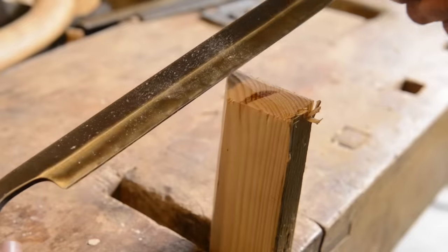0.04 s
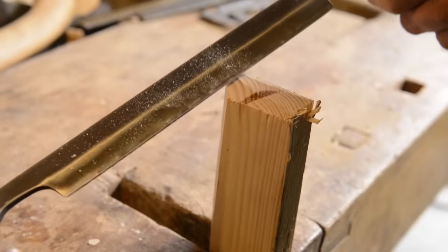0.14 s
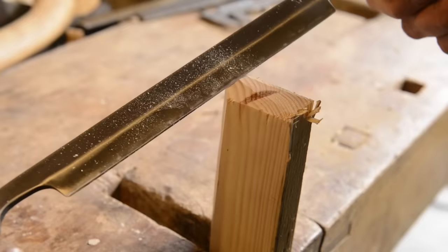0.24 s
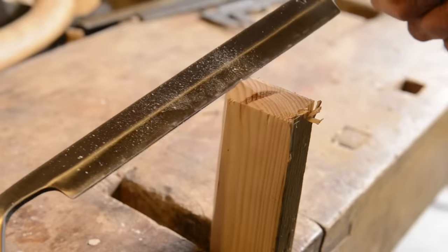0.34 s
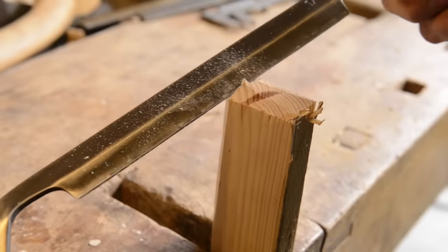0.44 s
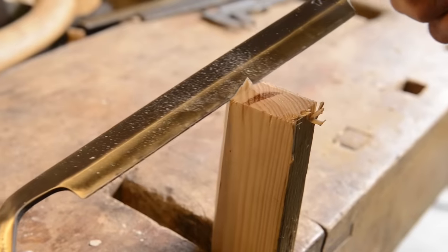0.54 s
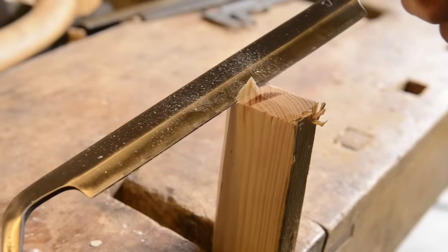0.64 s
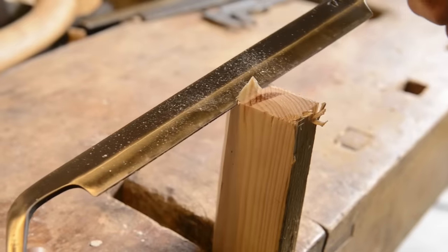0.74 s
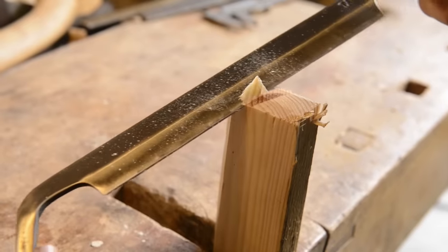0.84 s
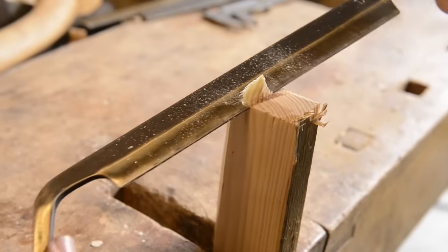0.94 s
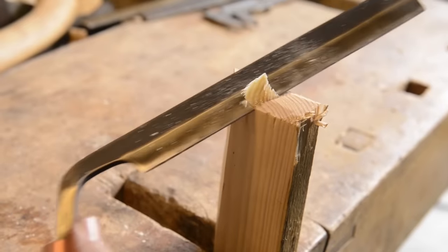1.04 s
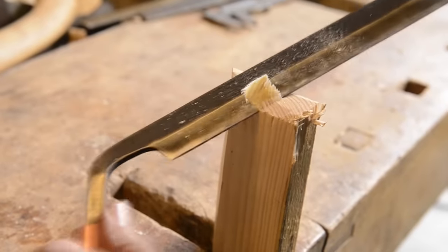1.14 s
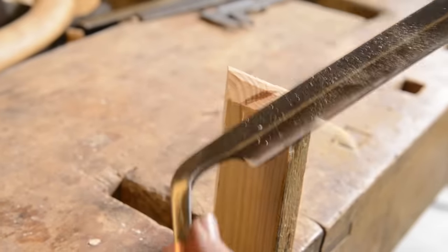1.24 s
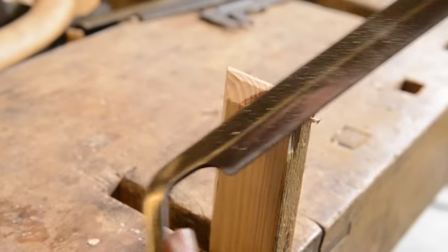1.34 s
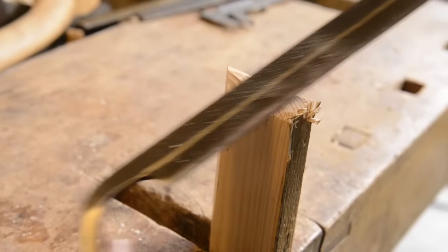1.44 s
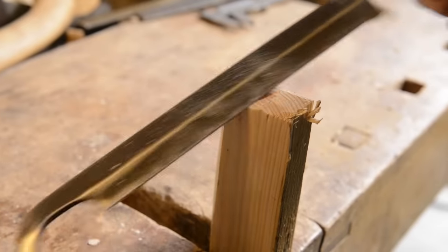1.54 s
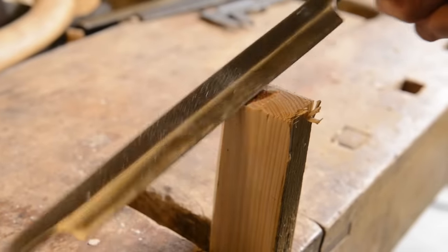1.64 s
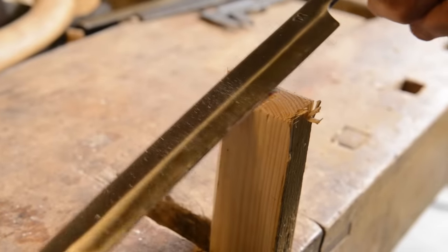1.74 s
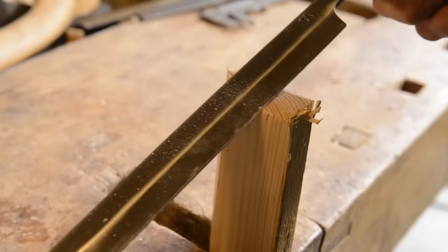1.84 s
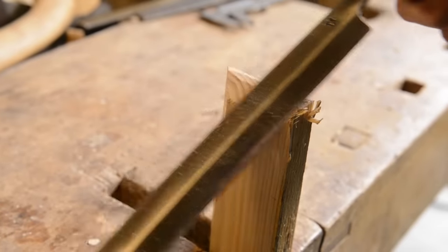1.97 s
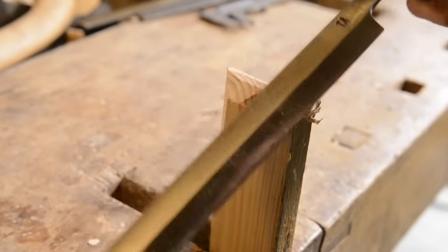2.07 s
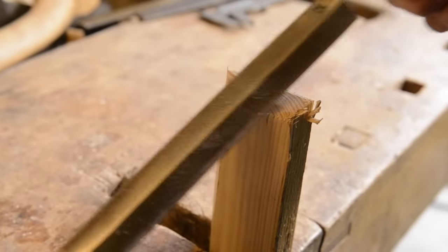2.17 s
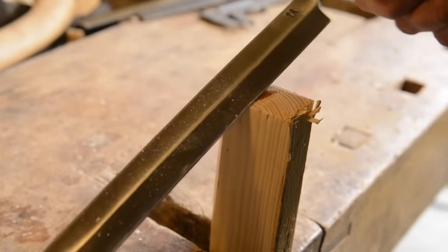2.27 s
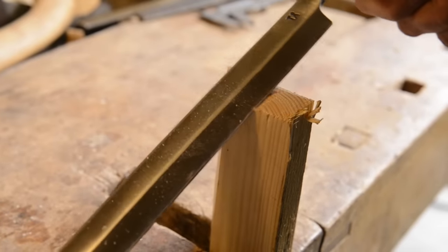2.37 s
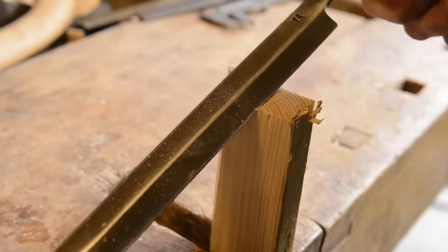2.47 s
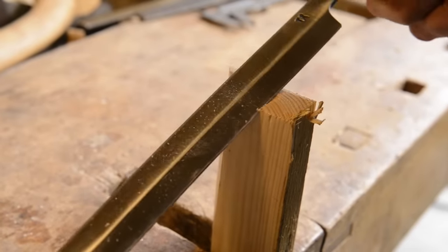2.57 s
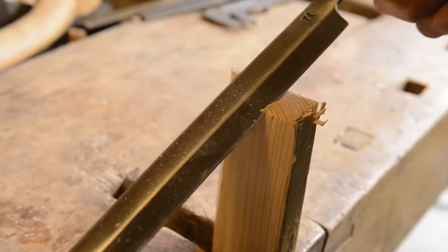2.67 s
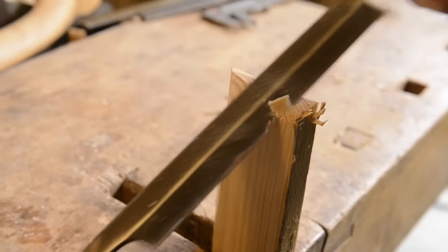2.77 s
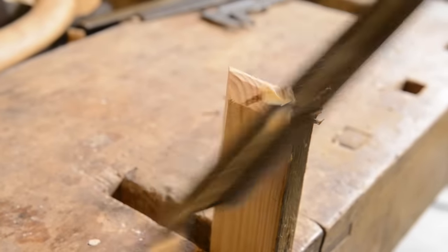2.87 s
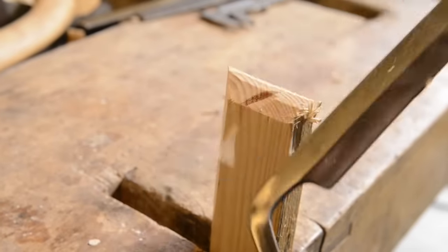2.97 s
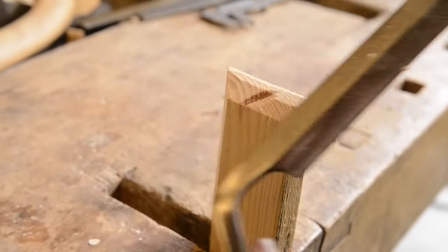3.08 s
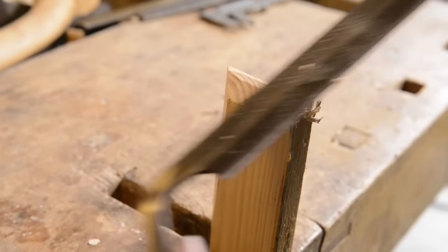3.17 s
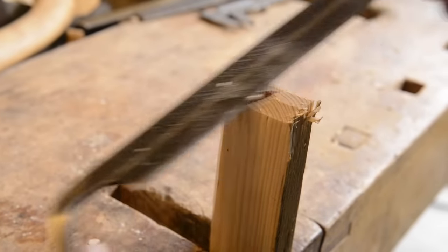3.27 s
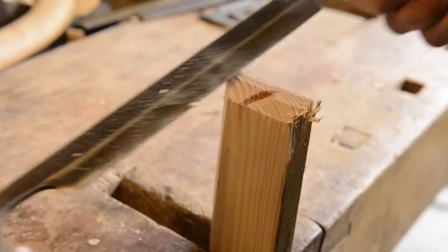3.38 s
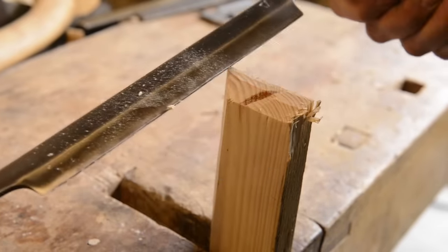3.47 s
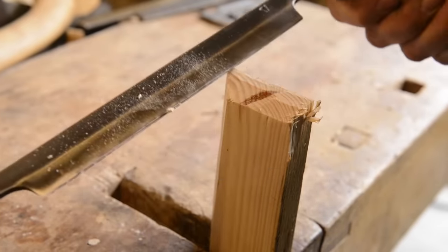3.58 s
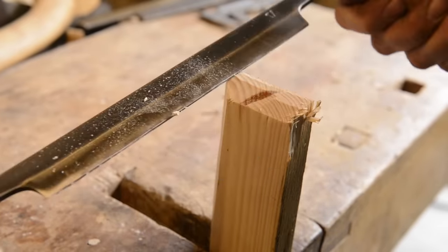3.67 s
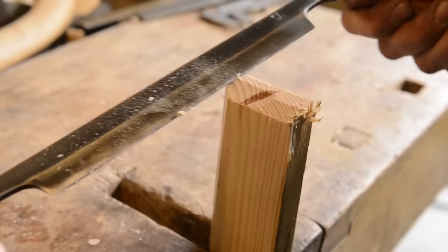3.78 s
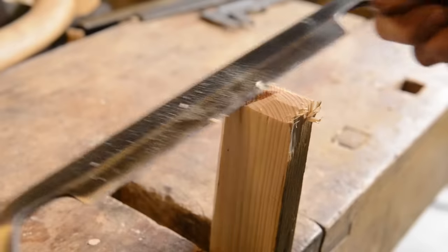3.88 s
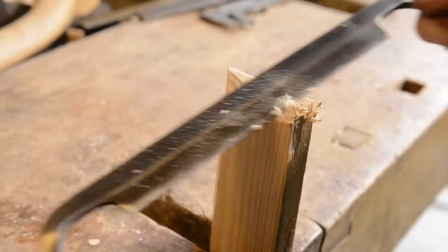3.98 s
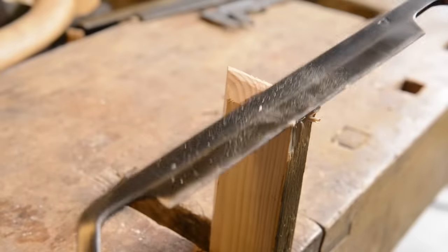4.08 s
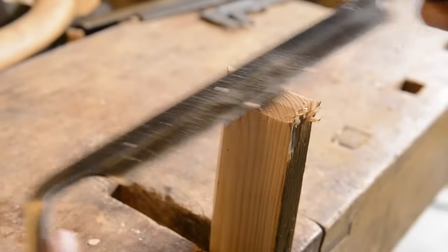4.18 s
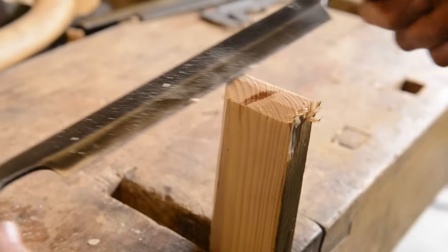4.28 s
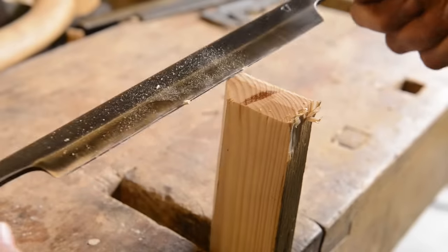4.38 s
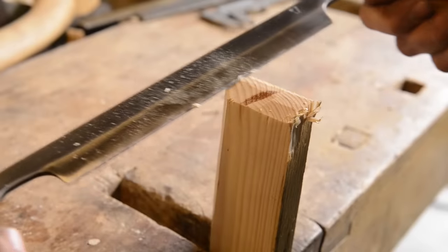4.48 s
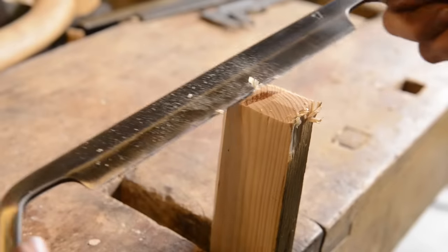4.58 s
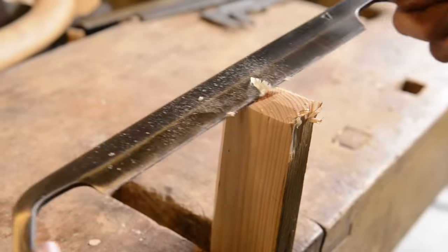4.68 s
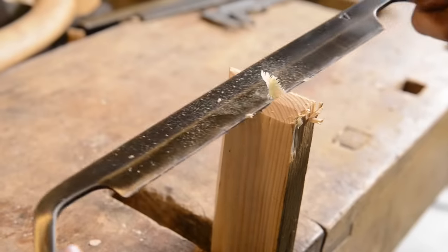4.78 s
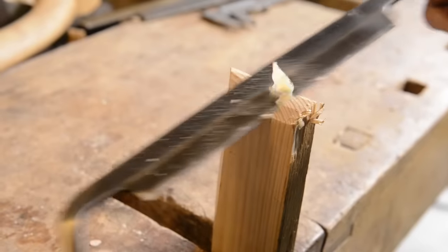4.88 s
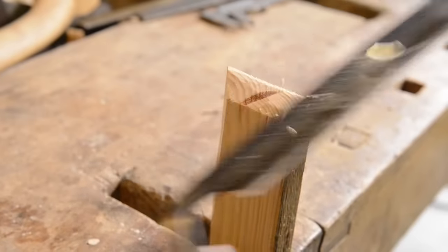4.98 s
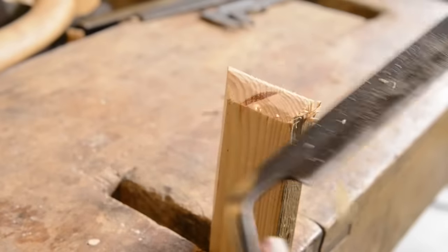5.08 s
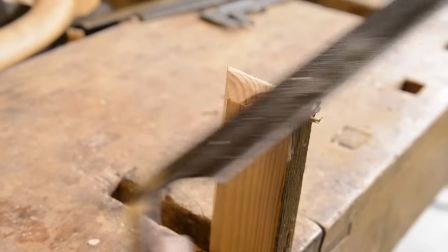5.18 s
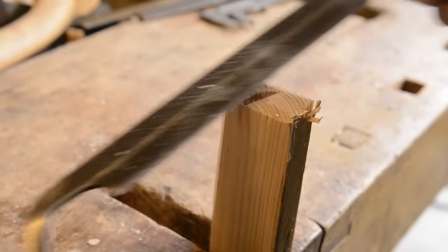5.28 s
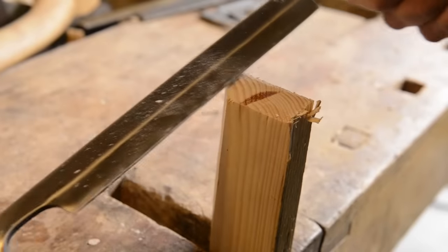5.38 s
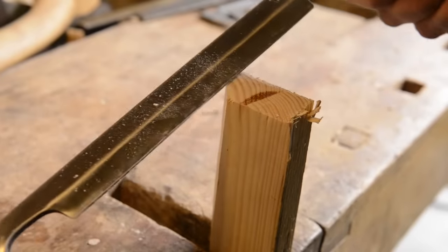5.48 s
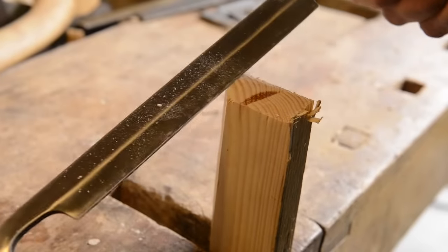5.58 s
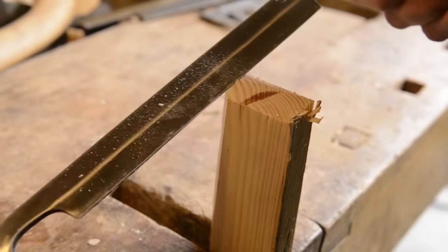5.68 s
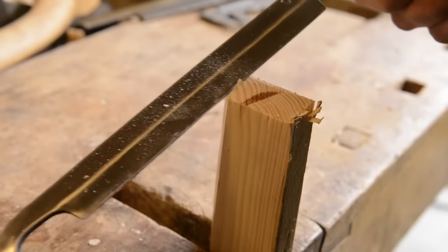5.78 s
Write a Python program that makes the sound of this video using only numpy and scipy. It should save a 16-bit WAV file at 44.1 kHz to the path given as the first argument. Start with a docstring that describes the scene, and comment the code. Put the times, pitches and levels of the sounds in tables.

```python
"""A steady outdoor hiss over a low rumble and a lone snap come first; then a drawknife pares softwood.
Each stroke on the clamped stick advances in bites: one force of breaking fibres and friction noise is
coloured by the wood, then split into bench boom, stick rasp, fibre tearing and edge hiss.
Shavings snap as shaped noise bursts, the blade knocks as noise plus ringing modes, soft bumps and brushing
mark its way back, and faint gliding whistles and short reflections surround the work."""
import sys
import numpy as np
from scipy import signal
from scipy.fft import rfft, irfft
from scipy.io import wavfile
from scipy.ndimage import uniform_filter1d, map_coordinates

SR = 44100
rng = np.random.default_rng(int(sys.argv[2]) if len(sys.argv) > 2 else 0)


def wav_record(signal):
    """Record a signal, one row per channel, as 16-bit PCM in the file named by sys.argv[1]."""
    frames = np.transpose(np.atleast_2d(signal))
    bounded = np.clip(frames, -1, 1)
    # unit amplitude maps onto the largest positive 16-bit level
    quanta = np.round(bounded * 32767).astype(np.int16)
    wavfile.write(sys.argv[1], SR, quanta)


N = 256662
TIME = np.arange(N) / SR
BURST_TIME = TIME[:SR // 2]   # half a second, the room for any short sound

# outdoor background colour: (frequency [Hz], relative density [dB per Hz])
AIR_COLOUR = [(13, -26), (22, -15), (49, -4), (76, -4.5), (112, -2), (199, -7), (241, -6.5), (651, -10.5),
              (707, -9.5), (857, -10.5), (931, -10), (1960, -17), (3690, -25.5), (6950, -26.5),
              (15900, -37.5)]
# thin, faint gliding tones:
# (time [s], length [s], start pitch [Hz], middle pitch [Hz], end pitch [Hz], peak level [dB])
WHISTLE_GLIDES = [(3.298, 0.095, 8700, 8300, 9100, -54), (4.16, 0.27, 10000, 10950, 10850, -65),
                  (4.382, 0.032, 8650, 8400, 7950, -58)]
# dying time of the reflections round the bench: (frequency [Hz], t60 [s])
REFLECTION_DECAY = [(150, 0.51), (500, 0.3), (2000, 0.3), (6000, 0.18), (14000, 0.26)]
# the flat of the blade brushes back over the wood: (time [s], length [s], landing level before the mix [dB])
RETURN_STROKES = [(1.274, 0.49, -29), (1.686, 0.074, -30.5), (2.993, 0.47, -37.5), (5.05, 0.4, -36)]
# soft bumps while the knife is carried back: (time [s], relative level [dB])
CARRY_BUMPS = [(0.01, -33.5), (1.366, -31), (1.466, -27), (1.491, -28.5), (3.061, -26.5), (3.18, -26.5),
               (3.3, -32.5), (5.145, -44), (5.256, -33), (5.312, -34), (5.377, -34)]
# shavings split and chips fly: (time [s], relative level [dB], centre [Hz], width [octaves], t60 [s])
SHAVING_SNAPS = [ (0.0345, -13.5, 8950, 0.35, 0.0085), (0.927, -12, 4500, 6.7, 0.015),
                 (1.029, -18.5, 3320, 3.4, 0.06), (1.0524, -9, 2880, 1.6, 0.011),
                 (1.21, -9, 3130, 3.8, 0.052), (1.2516, 12, 2076, 0.18, 0.0012),
                 (1.511, -29.5, 3530, 1.6, 0.024), (1.816, -27, 3950, 5.7, 0.069),
                 (2.678, -11, 2650, 1.1, 0.013), (2.794, -3.5, 3480, 5.8, 0.057),
                 (2.812, 2, 3180, 0.092, 0.013), (2.837, 0.5, 2470, 0.6, 0.012),
                 (2.852, 4.5, 2740, 0.48, 0.004), (2.903, -1, 2070, 0.59, 0.023),
                 (2.911, -2, 6700, 1.3, 0.039), (2.986, -8.5, 3260, 2.4, 0.036),
                 (3.128, -27, 10100, 2, 0.023), (4.732, -15.5, 3560, 8.2, 0.051),
                 (4.945, -6, 2530, 0.22, 0.052), (4.991, -4, 4000, 11, 0.029),
                 (5.037, -23, 3500, 1.4, 0.016), (5.074, -23.5, 5000, 1.6, 0.014),
                 (5.187, -38.5, 7200, 1.5, 0.034), (5.598, -42, 7000, 2.3, 0.11)]
# blade and stick knock together, and once, near 1.67 s, the brushing blade squeaks into a ring: (time [s], ring
# level [dB], most excited pitch [Hz], spread [octaves], contact noise level [dB])
BLADE_KNOCKS = [ (0.237, -35, 410, 1, -46), (1.054, -15, 274, 1.14, -47), (1.218, -11.5, 397, 1.27, -28),
                (1.229, -10.5, 325, 0.38, -19.5), (1.243, -14.5, 770, 0.29, -32),
                (1.254, -14.5, 1810, 0.15, -15.5), (1.587, -19, 575, 0.27, -25.5),
                (1.629, -26, 520, 0.26, -38), (1.67, -24, 1024, 0.048, -34), (1.695, -25, 2100, 0.6, -16.5),
                (1.699, -5.5, 1007, 0.031, -30), (1.717, -24, 645, 0.3, -24.5), (2.35, -40, 740, 1.3, -29),
                (2.92, -9.5, 327, 0.5, -21), (3.673, -27.5, 1720, 0.13, -28.5),
                (3.682, -26, 560, 0.47, -52), (4.415, -32, 573, 0.62, -36.5), (5.581, -36, 485, 0.63, -49)]
# modes of blade, stick and bench: (pitch [Hz], level relative to the knock's ring [dB], t60 [s])
WORK_MODES = [ (172, -4.5, 0.2), (235, 4, 0.065), (320, -7.5, 0.22), (348.2, -3.5, 0.19), (452, -2, 0.11),
              (550, 3, 0.03), (617, -12, 0.16), (759, -3.5, 0.24), (950, 4, 0.099), (1007, -8, .23),
              (1140, -6.5, 0.063), (1194, 4, 0.21), (1720, 5.5, 0.039), (2040, 7, 0.098), (2340, 3, 0.037),
              (2890, -41, .09), (3280, 12, 0.025)]
# colour of the contact noise: (frequency [Hz], relative density [dB per Hz])
CONTACT_COLOUR = [(50, -4), (120, 11.5), (260, 9), (600, 12.5), (1300, 6.5), (2200, -10), (3600, -27),
                  (5000, -16), (9000, -25), (16000, -27)]
# broad colour of the cut: (frequency [Hz], relative density [dB per Hz])
CUT_COLOUR = [(53, -74.5), (90, -51), (136, -9.5), (180, -8.5), (296, 2), (352, -1.5), (519, -7),
              (873, 0.5), (994, -8.5), (1440, -10.5), (2930, -18.5), (4330, -20.5), (6120, -15.5),
              (9440, -17.5), (15900, -33)]
# resonances and hollows of the rubbed blade and stick: (centre [Hz], width [Hz], lift [dB])
WOOD_FORMANTS = [(143.8, 34, 15), (228.7, 26.4, 13), (300, 41, 7), (407, 12.6, 6.5), (734, 11, 10),
                 (881.3, 19.5, 8), (1280, 130, -5), (1460, 69, -8), (1675, 18, 11.5), (2004, 51, 7),
                 (2236, 72, 7), (2503, 125, 7.5), (2737, 96, 6), (2917, 260, 9), (3292, 49, 7),
                 (3510, 350, 3.5), (3850, 39, 14.5), (4000, 430, -3), (4946, 71, 9.5), (5360, 55, 9),
                 (5720, 41, 12), (6130, 74, 6), (6650, 36, 11), (7105, 31, 14), (7600, 100, 8),
                 (7333, 49, -17), (8470, 21, 16.5), (9750, 53, 7.5), (10500, 50, -1)]
# each stroke meets blade and stick at another spot; the shaving pitch is that of mid-stroke:
# (time [s], bench boom over stick rasp [dB], stick pitch [Hz], lift [dB],
#  shaving pitch [Hz], lift [dB], edge pitch [Hz], lift [dB])
CUT_STROKES = [ (0.30, -1.5, 895, 3, 2950, 2.5, 7550, 2.5), (0.80, 7, 590, 2.5, 5270, -1, 8400, 4.5),
               (1.00, 6, 990, 3.5, 3560, 3, 9200, 3.5), (1.80, -2, 755, 6.5, 3260, 5.5, 5550, 3),
               (2.38, -9, 750, 4.5, 6700, -5, 8100, 4), (2.58, 0.5, 387, 1, 3150, 4.5, 10800, 3),
               (3.68, -7, 690, 6.5, 2670, 7.5, 5140, 1.5), (4.46, -3.5, 580, 7.5, 2830, 5.5, 5860, 2.5),
               (4.87, 0.5, 1184, 6, 2860, 11.5, 10800, 1.5), (5.701, 0.5, 870, 1.5, 3100, 0, 6070, 4.5)]
# the edge advances in bites, each a rise, a hold and a release; levels before the mix:
# (time [s], rise [s], hold [s], edge hiss [dB], stick rasp over hiss [dB], fibre tearing over hiss [dB])
CUT_BITES = [ (0.33, 0.041, 0.052, -31, 0.5, -2.5), (0.397, 0.047, 0.065, -31, -1.5, 0.5),
             (0.546, 0.056, 0.057, -27.5, -2.5, 1.5), (0.674, 0.029, 0.077, -35.5, -4.5, 4.5),
             (0.8, 0.049, 0.04, -27, -6.5, 3.5), (0.893, 0.043, 0.031, -24.5, -4.5, 4),
             (1.016, 0.036, 0.02, -24, 0, 4), (1.084, 0.055, 0.017, -20.5, -4, 4),
             (1.807, 0.025, 0.033, -37.5, 4.5, 7), (1.87, 0.091, 0.024, -35.5, 4, 5),
             (1.941, 0.057, 0.014, -29, 5, -4.5), (2.397, 0.029, 0.015, -41, 8, 5),
             (2.506, 0.023, 0.02, -46.5, 5, 12), (2.591, 0.039, 0.044, -38.5, -2, 10),
             (2.655, 0.024, 0.1, -32, -3, 8.5), (2.740, 0.054, 0.071, -14, -3.5, 2.5),
             (2.865, 0.033, 0.0028, -12, -1.5, -1.5), (3.693, 0.016, 0.043, -38.5, 0.5, -6),
             (3.781, 0.057, 0.015, -22, -4.5, -10.5), (3.835, 0.039, 0.051, -28.5, 7, -5),
             (3.87, 0.063, .04, -23.5, 6.5, 2), (3.941, 0.053, 0.075, -20, 3.5, -3),
             (4.48, 0.048, 0.095, -23, -5.5, -9), (4.542, 0.03, 0.083, -25.5, 5.5, 0),
             (4.666, 0.099, 0.04, -20.5, 6, 4), (4.802, 0.023, 0.047, -29.5, -5, 2.5),
             (4.884, 0.073, 0.027, -12, -2.5, 1.5), (4.997, 0.017, 0.023, -27.5, 5, -8),
             (5.715, 0.029, 0.044, -32, -2, -3.5)]
# how fast each part falls after a bite: bench, stick, fibres, edge [dB per s]
PART_RELEASES = [350, 316, 410, 430]

AIR_DB = -44.5
BUMP_HZ = 338
RISE_CURVE = 1.4   # the force builds as this power of time
BENCH_LAG_S = 0.0085   # the heavy bench answers late
DRAG_DB = -10.5   # between bites the edge stays in the wood and drags on, this far below them
SHAVING_FALL_OCTAVES = 0.16   # over a stroke the shaving grows longer and rings lower
WANDER, WANDER_RATE = .006, 4   # waver as the contact travels: share of pitch, times a second
CUTOFF_HZ = 15900


def from_db(db):
    """Decibels to gain."""
    return 10 ** (np.asarray(db) / 20)


def rms_one(x):
    """Scale to unit rms."""
    return x / np.sqrt(np.mean(x ** 2) + 1e-20)


def at_hz(points, hz):
    """Read the second column of a table on a log-frequency axis."""
    table = np.array(points)
    return np.interp(np.log(hz), np.log(table[:, 0]), table[:, 1])


def colour(x, db_at, size=8192):
    """Causal (minimum-phase) filter whose gain in dB is a function of Hz; white noise keeps its level."""
    hz = np.maximum(np.arange(size // 2 + 1) * SR / size, 1)
    gain = rms_one(from_db(db_at(hz)))
    cepstrum = irfft(np.log(gain + 1e-9))
    # folding the cepstrum onto positive time makes the filter minimum-phase
    cepstrum[1:size // 2] *= 2
    cepstrum[size // 2 + 1:] = 0
    response = irfft(np.exp(rfft(cepstrum)))
    return signal.fftconvolve(x, response)[:len(x)]


def band(x, low, high, order=4):
    """Butterworth band-pass."""
    edges = [low, min(high, .48 * SR)]
    return signal.sosfilt(signal.butter(order, edges, "band", fs=SR, output="sos"), x)


def drift(rate):
    """Smooth random curve of unit rms that changes about `rate` times a second."""
    hz = np.arange(N // 2 + 1) * SR / N
    spectrum = rfft(rng.standard_normal(N)) / (1 + (hz / rate) ** 2)
    return rms_one(irfft(spectrum, N))


def fade(t60):
    """Half a second of exponential decay, down 60 dB after t60 seconds."""
    return np.exp(-np.log(1000) * BURST_TIME / t60)


def burst(t60):
    """Noise that starts at once and dies away."""
    return rng.standard_normal(SR // 2) * fade(t60)


def add(out, s, sound):
    """Mix a sound in at a time in seconds."""
    start = max(round(s * SR), 0)
    out[start:start + len(sound)] += sound[:N - start]


def hump(hz, centre, width):
    """Resonance shape, 1 on top."""
    return 1 / (1 + (2 * (hz - centre) / width) ** 2)


def push(t, rise_s, hold_s, release_db_per_s):
    """Gain of one push, t seconds after it starts: it builds, holds and lets go."""
    built = np.clip(t / rise_s, 1e-6, 1) ** RISE_CURVE
    return built * from_db(-release_db_per_s * np.maximum(t - rise_s - hold_s, 0))


def wood_colour(hz):
    """Broad colour of the cut with its resonances and hollows, in dB."""
    return at_hz(CUT_COLOUR, hz) + sum(db * hump(hz, centre, width) for centre, width, db in WOOD_FORMANTS)


def air():
    """Steady outdoor hiss over a low rumble: coloured noise whose level wavers slightly."""
    waver_db = .35 * drift(2)
    hiss = colour(rng.standard_normal(N), lambda hz: at_hz(AIR_COLOUR, hz))
    return from_db(AIR_DB + waver_db) * hiss


def whistles():
    """Short, high sine tones that glide along a parabola through three pitches and swell and fade."""
    out = np.zeros(N)
    for s, length, start_hz, middle_hz, end_hz, db in WHISTLE_GLIDES:
        along = np.linspace(0, 1, int(length * SR))
        parabola = np.polyfit([0, .5, 1], [start_hz, middle_hz, end_hz], 2)
        phase = 2 * np.pi * np.cumsum(np.polyval(parabola, along)) / SR
        add(out, s, from_db(db) * np.sin(np.pi * along) * np.sin(phase))
    return out


def reflections(build_s=0.00043):
    """Diffuse response of the surroundings, unit energy: noise bands that each die at their own rate."""
    edges = np.geomspace(80, 20000, 9)
    tail = 0
    for low, high in zip(edges, edges[1:]):
        t60 = at_hz(REFLECTION_DECAY, np.sqrt(low * high))
        tail = tail + band(burst(t60), low, high, order=2)
    tail = tail * (1 - np.exp(-BURST_TIME / build_s))
    return tail / np.sqrt(np.sum(tail ** 2))


def brushing(catch_db=2.5, catch_rate=40, tilt_db=-0.5, landing_s=0.011, ease_db=9, ease_s=0.15,
             lift_db_per_s=170):
    """Light rubbing that catches here and there and eases after the blade lands; tilt in dB an octave."""
    rub = rng.standard_normal(N) * from_db(catch_db * drift(catch_rate))
    pressure = np.zeros(N)
    for s, length, db in RETURN_STROKES:
        eased = 1 - np.exp(-np.maximum(TIME - s - landing_s, 0) / ease_s)
        stroke = push(TIME - s, landing_s, length - landing_s, lift_db_per_s)
        pressure += from_db(db - ease_db * eased) * stroke
    return pressure * colour(rub, lambda hz: wood_colour(hz) + tilt_db * np.log2(hz))


def bumps(t60=0.045, width=1.57, swell_s=0.0096, level_db=4.0):
    """Dull, short thuds: low-pitched noise with a soft start and a quick decay."""
    out = np.zeros(N)
    swell = from_db(level_db) * 2 * (1 - np.exp(-BURST_TIME / swell_s))
    for s, db in CARRY_BUMPS:
        noise = rng.standard_normal(SR // 2)
        thud = rms_one(band(noise, BUMP_HZ / width, BUMP_HZ * width, order=3))
        add(out, s, from_db(db) * thud * fade(t60) * swell)
    return out


def snaps(skirt_db=-14.0, first_crack=1.84, brittle_s=0.04, swell_share=0.055, damping_hz=12000):
    """A brittle break is one sharp crack, a tough one swells and tears on; piece size sets the pitch."""
    out = np.zeros(N)
    for s, db, centre_hz, width, t60 in SHAVING_SNAPS:
        split = burst(t60) * (1 - np.exp(-BURST_TIME / (swell_share * t60)))
        split[0] = first_crack * np.exp(-t60 / brittle_s)   # the shorter the snap, the sharper its onset

        def snap_db(hz):
            """Peak at the piece's pitch, with the treble absorbed by the wood."""
            peak = skirt_db * np.log10(1 + (2 * np.log2(hz / centre_hz) / width) ** 2)
            size_loss = 10 * np.log10(1 + (hz / centre_hz / 2) ** 2)
            wood_loss = 10 * np.log10(1 + (hz / damping_hz) ** 4)
            return peak - size_loss - wood_loss

        add(out, s, from_db(db) * colour(split, snap_db))
    return out


def knocks(contact_t60=0.13, press_s=0.00029, scatter_db=0.1,
           tick_db=-2.0, tick_hz=2600, tick_octaves=0.94, tick_t60=0.029):
    """The steel lands with a tick; where and how hard it lands decides which modes ring most."""
    def tick_colour(hz):
        """Single broad peak of the tick, in dB."""
        return -20 * np.log10(1 + (np.log2(hz / tick_hz) / tick_octaves * 2) ** 2)

    out = np.zeros(N)
    press = 1 - np.exp(-BURST_TIME / press_s)   # soft wood gives way before it pushes back
    for s, ring_db, centre_hz, spread, contact_db in BLADE_KNOCKS:
        tick = colour(burst(tick_t60), tick_colour)
        contact = colour(burst(contact_t60), lambda hz: at_hz(CONTACT_COLOUR, hz))
        sound = from_db(contact_db) * (contact + from_db(tick_db) * tick)
        for hz, db, t60 in WORK_MODES:
            share = 1 / (1 + (np.log2(hz / centre_hz) / spread) ** 4)
            swing = np.sin(2 * np.pi * hz * BURST_TIME) * rng.choice([-1, 1])
            level = from_db(ring_db + db + scatter_db * rng.standard_normal())
            sound = sound + share * level * swing * fade(t60)
        add(out, s, sound * press)
    return out


def stroke_gains(t, bites, boom_db):
    """Gains of bench, stick, fibres and edge: each bite pushes, and a quieter drag bridges the gaps."""
    s, rise_s, hold_s, hiss_db, rasp_db, tear_db = np.transpose(bites)
    levels_db = [hiss_db + rasp_db + boom_db, hiss_db + rasp_db, hiss_db + tear_db, hiss_db]
    gains = []
    for db, lag, release in zip(levels_db, [BENCH_LAG_S, 0, 0, 0], PART_RELEASES):
        pushes = from_db(db) * push(t[:, None] - s - lag, rise_s, hold_s, release)
        bridge_db = np.interp(t - lag, s + rise_s, db, left=-np.inf, right=-np.inf)
        gains.append(np.maximum(pushes.max(axis=1), from_db(DRAG_DB + bridge_db)))
    return gains


def voiced(force, along, voicing, widths):
    """The force colours itself in the wood; `along` runs from 0 to 1 over the stroke."""
    sound = 0
    for place in np.linspace(0, 1, 3):   # crossfade three colours along the stroke
        shaving_ratio = 2 ** (SHAVING_FALL_OCTAVES * (.5 - place))
        pitches = np.array(voicing[::2]) * [1, shaving_ratio, 1]   # stick, shaving, edge
        spot = list(zip(pitches, voicing[1::2], widths))
        here = colour(force, lambda hz: wood_colour(hz) + sum(
            db * hump(hz, centre, width) for centre, db, width in spot))
        sound = sound + here * np.maximum(1 - 2 * np.abs(along - place), 0)
    # reading the sound at a wavering speed bends its resonances
    speed = 1 + WANDER * drift(WANDER_RATE)[:len(force)]
    return map_coordinates(sound, [np.cumsum(speed)], order=3, mode="mirror")


def cutting(fibres_per_s=1700, size_db=3.0, friction=0.76, slip_db=0.5, slip_rate=170,
            stick_width_hz=220, shaving_width_hz=600, edge_width_hz=1400):
    """Fibres break one by one under an edge that sticks and slips; the one force drives every part."""
    sizes = from_db(size_db * np.minimum(rng.exponential(1, N), 4)) * rng.choice([-1, 1], N)
    breaks = rms_one(sizes * (rng.random(N) < fibres_per_s / SR))
    force = (breaks + friction * rng.standard_normal(N)) * from_db(slip_db * drift(slip_rate))
    widths = [stick_width_hz, shaving_width_hz, edge_width_hz]
    edges = [105, 450, 1200, 4000, 17000]   # Hz, between them bench, stick, fibres, edge
    ends = [stroke[0] for stroke in CUT_STROKES[1:]] + [N / SR]
    out = np.zeros(N)
    for (start, boom_db, *voicing), end in zip(CUT_STROKES, ends):
        near = (TIME > start) & (TIME < end + .15)   # leave room for the release
        bites = [bite for bite in CUT_BITES if start <= bite[0] < end]
        last_hold_end = sum(bites[-1][:3])
        along = np.interp(TIME[near], [bites[0][0], last_hold_end], [0, 1])
        sound = voiced(force[near], along, voicing, widths)
        gains = stroke_gains(TIME[near], bites, boom_db)
        for gain, low, high in zip(gains, edges, edges[1:]):
            part = band(sound, low, high)
            # level each part over about 54 ms, so that the bites alone set its loudness
            part = part / np.sqrt(uniform_filter1d(part ** 2, size=2400) + 1e-12)
            out[near] += part * gain
    return out


def scene(cut_db=-5.0, cut_wet_db=-11, knock_wet_db=-8, snap_wet_db=-9, lowest_hz=110):
    """The work close by, its reflections and the background."""
    cut = from_db(cut_db) * (cutting() + brushing())
    # a gentle high-pass takes the lowest bass out of knocks and bumps
    knock = band(knocks() + bumps(), lowest_hz, CUTOFF_HZ, order=1)
    snap = snaps()
    send = from_db(cut_wet_db) * cut + from_db(knock_wet_db) * knock + from_db(snap_wet_db) * snap
    reflected = signal.fftconvolve(send, reflections())[:N]
    return (cut + knock + snap + reflected + air() + whistles())[None]


def record(dry):
    """Peaks beyond full scale overload the recorder and clip; a steep low-pass cuts the top."""
    top_cut = signal.ellip(10, .1, 70, CUTOFF_HZ, fs=SR, output="sos")
    return signal.sosfilt(top_cut, np.clip(dry, -1, 1))


dry = scene()
out = record(dry)
wav_record(out)
```